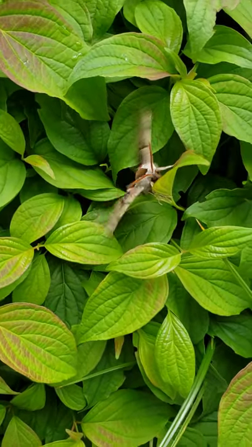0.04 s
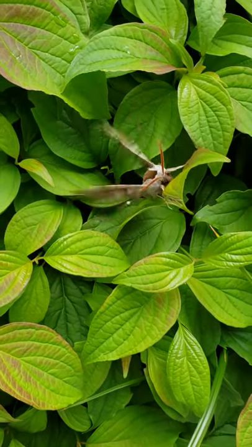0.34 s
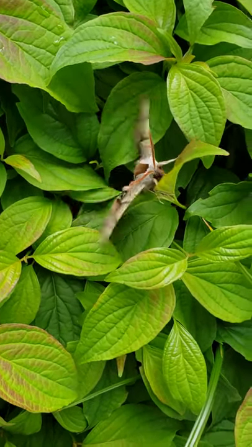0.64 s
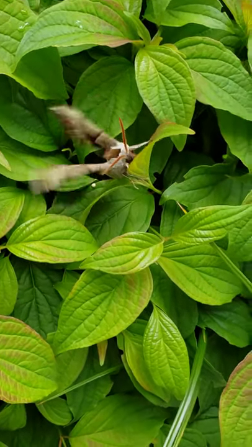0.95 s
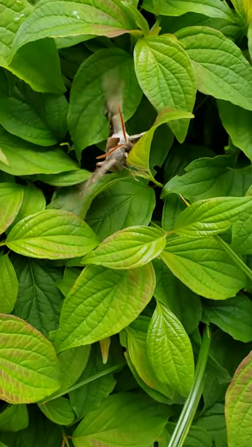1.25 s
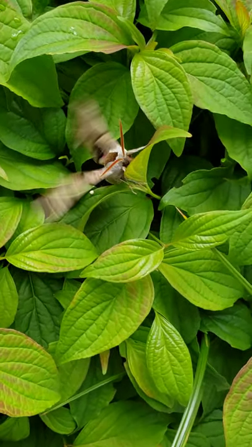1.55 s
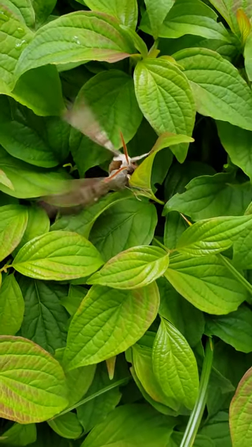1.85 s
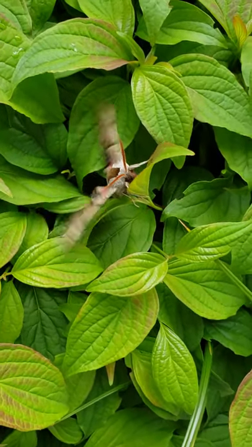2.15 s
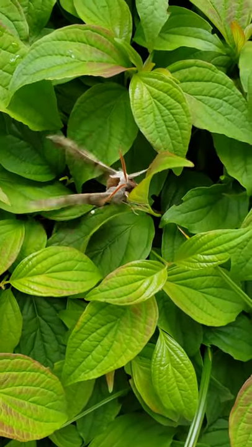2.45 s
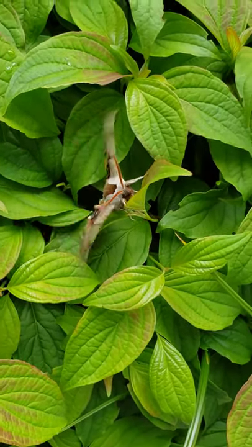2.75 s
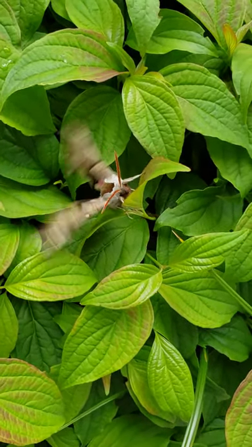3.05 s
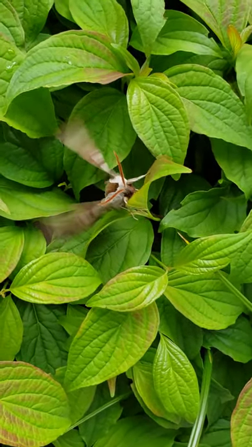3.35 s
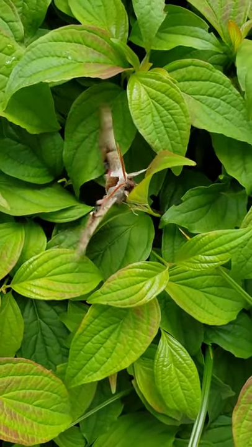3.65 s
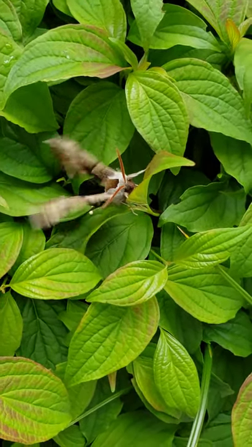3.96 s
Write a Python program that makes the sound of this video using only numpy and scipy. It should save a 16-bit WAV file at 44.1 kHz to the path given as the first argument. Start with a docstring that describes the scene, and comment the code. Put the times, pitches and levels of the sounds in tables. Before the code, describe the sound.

Distant traffic rumbles low throughout a quiet garden, with a wavering engine drone and light microphone hiss. A far bird gives faint, raspy falling chirps about once a second from 0.6 seconds, with thin whistles near 0.9 and 3.7 seconds. Leaves rustle faintly, with a tiny close tick around 0.5 seconds. Two soft, distant hisses echo away at about 1.3 and 2.9 seconds, the second stronger.

```python
"""A low rumble of far traffic fills a quiet garden beside a building, with a wavering engine drone in it.
The rumble and tyre wash are broadband noise; the engine and far machines are modulated tones.
A distant bird repeats a raspy falling chirp that the walls reflect; others whistle thinly.
Two short hisses reverberate from far off, leaves fizz faintly and tick close by,
and the left microphone hisses steadily."""
import sys
import numpy as np
from scipy import signal
from scipy.fft import rfft, irfft
from scipy.io import wavfile

SR = 44100
rng = np.random.default_rng(int(sys.argv[2]) if len(sys.argv) > 2 else 0)


def transcribe(signal):
    """Save signal, clipped to [-1, 1], as a 16-bit WAV file at the path in sys.argv[1]."""
    frames = np.atleast_2d(signal).T
    limited = np.clip(frames, -1, 1)
    pcm = np.round(limited * 32767).astype(np.int16)
    wavfile.write(sys.argv[1], SR, pcm)


N = 176400
TIME, HZ = np.arange(N) / SR, np.fft.rfftfreq(N, 1 / SR)

# traffic rumble and tyre wash (frequency [Hz], density [dB/Hz])
RUMBLE_SPECTRUM = [(15, -91), (25, -81), (33, -69), (45, -71.5), (56, -56.5), (72, -58.5), (90, -58.5),
                   (130, -65), (165, -68), (235, -70.5), (330, -80.5), (500, -94.5), (1000, -115)]
WASH_SPECTRUM = [(100, -91), (200, -78.5), (300, -78.5), (450, -79), (700, -80), (950, -78), (1300, -85.5),
                 (1750, -90), (2300, -96), (2750, -95), (3700, -104), (6000, -115), (9000, -135)]
# contour whose swings the rumble follows at about half depth (time [s], level [dB])
RUMBLE_CONTOUR = [(0.0, -46.5), (0.5, -38.5), (0.68, -44.5), (0.75, -41), (1.76, -41.5), (1.8, -32),
                  (1.83, -46), (1.95, -37.5), (2.15, -45.5), (3.11, -40.5), (3.13, -34.5), (3.27, -51),
                  (3.48, -37), (3.63, -48), (3.68, -35.5), (4.0, -49)]
# engine envelope (time [s], relative level [dB])
DRONE_LEVEL = [(0.0, -37.5), (0.11, -31.5), (0.13, -27.5), (0.29, -40.5), (0.54, -33.5), (0.79, -43.5),
               (0.85, -62), (0.89, -46), (1.05, -49), (1.11, -27), (1.25, -40), (1.28, -34), (1.45, -48),
               (1.48, -41), (1.58, -56), (1.61, -37), (1.79, -41), (1.93, -56), (1.97, -36), (2.14, -61),
               (2.17, -38), (2.28, -53), (2.42, -34), (2.56, -58), (2.61, -39.5), (2.74, -35), (2.75, -40),
               (3.16, -38.5), (3.21, -45), (3.3, -38), (3.54, -30.5), (3.56, -36), (3.89, -34), (4.0, -45)]
# engine pitch (time [s], frequency [Hz])
DRONE_PITCH = [(0, 58.33), (.6, 57.73), (1.05, 62.57), (1.3, 65.6), (1.75, 63), (2, 58), (2.45, 64.9),
               (3, 68), (3.5, 71), (4, 69.2)]
# hums of far machines (frequency [Hz], level [dB])
HUMS = [(120, -51), (135, -56.5), (250, -64.5), (305, -64.5)]
# falling chirps (time [s], end frequency [Hz], level [dB])
CHIRPS = [(.575, 2470, -62), (.612, 1933, -54), (.815, 1960, -57.5), (1.555, 1950, -61), (1.6, 1860, -51),
          (1.925, 2000, -62), (1.98, 2000, -60), (2.475, 2480, -62.5), (2.515, 1932, -59),
          (2.575, 1880, -53.5), (3.053, 1985, -56.5), (3.48, 1977, -60.5), (3.524, 2450, -65),
          (3.557, 1837, -52)]
# whistles (time [s], duration [s], start frequency [Hz], end frequency [Hz], level [dB], roughness [rad])
WHISTLES = [(0.125, 0.45, 3085, 3085, -73, 0.8), (0.745, 0.19, 6000, 5900, -64, 1.6),
            (0.889, 0.071, 6500, 6740, -53, .45), (.985, .075, 6350, 6000, -63, 1.2),
            (3.35, 0.15, 2990, 3010, -68, 0.92), (3.681, .11, 6700, 6644, -66, 1.8),
            (3.725, 0.057, 6150, 5850, -62, 0.71), (3.736, .06, 5450, 5360, -66, 1.1),
            (3.84, 0.18, 3170, 3170, -72, 0.39)]
# wall reflections (delay [s], gain [dB])
WALL_ECHOES = [(.025, -15), (.042, -7), (.068, -16.5)]
# far hisses (time [s], gain [dB])
FAR_HISSES = [(1.25, -8.5), (2.884, -2.5)]
# their spectrum (frequency [Hz], density [dB/Hz])
FAR_HISS_SPECTRUM = [(150, -91), (400, -81), (900, -78), (1700, -84), (2800, -83.5), (3800, -84.5),
                     (4500, -91), (5200, -84.5), (6300, -94), (7500, -103), (9000, -104), (15000, -112)]
# leaf fizz (frequency [Hz], density [dB/Hz])
FIZZ_SPECTRUM = [(1500, -108), (3700, -101), (4800, -99.5), (6400, -99), (7300, -106), (8300, -120),
                 (9300, -106), (10500, -99), (11800, -93.5), (12600, -97), (14000, -96.5), (16000, -100)]
# its swell (time [s], gain [dB])
FIZZ_SWELL = [(0, 1.5), (.3, 1.5), (.52, 7.5), (.65, 4), (1, 6.5), (1.4, 2.5), (1.9, -0.5), (2.8, -3.5),
              (3.2, 0), (3.78, 2.5), (4, -1.5)]
# leaf ticks (time [s], relative level [dB])
TICKS = [(0.0292, -16), (.316, -23), (0.451, -23), (0.553, -5)]
# self-noise of the left microphone (frequency [Hz], density [dB/Hz])
MIC_SPECTRUM = [(300, -81), (2000, -90), (3500, -94), (5500, -94.5), (7600, -89), (8400, -95), (9600, -94),
                (11500, -94), (13500, -93), (16000, -90.5)]
# likeness of left and right (frequency [Hz], coherence [0 to 1])
COHERENCE = [(60, 1), (130, 0.94), (290, .9), (450, 0.53), (640, 0.027), (1400, 0), (15000, 0.0082)]

BASS_PAN_DB = 2.26


def amp(db):
    """Converts decibels to an amplitude ratio."""
    return 10 ** (np.asarray(db) / 20)


def unit(x):
    """Normalises to rms 1."""
    return x / np.sqrt(np.mean(x ** 2) + 1e-20)


def curve(points):
    """Interpolates a table over time."""
    return np.interp(TIME, *np.transpose(points))


def spectrum(points):
    """Interpolates a table over log frequency."""
    hz, value = np.transpose(points)
    return np.interp(np.log(HZ + 1), np.log(hz + 1), value)


def pan(db):
    """Level difference, left minus right, gives direction."""
    return amp([[db / 2], [-db / 2]])


def add(mix, start_s, sound):
    """Superposes a sound on the mix."""
    part = mix[max(round(start_s * SR), 0):][:len(sound)]
    part += sound[:len(part)]


def drift(rate_hz, count=N):
    """Low-passed noise of rms 1 serves as a random modulator."""
    hz = np.fft.rfftfreq(count, 1 / SR)
    white = rfft(rng.standard_normal(count))
    return unit(irfft(white * (hz > 0) * np.exp(-(hz / rate_hz) ** 2), count))


def noise(density):
    """Diffuse-field noise: the channels are coherent only in the bass."""
    left, independent = rfft(rng.standard_normal((2, N)))
    coherence = spectrum(COHERENCE)
    right = coherence * left + np.sqrt(1 - coherence ** 2) * independent
    return irfft(np.array([left, right]) * amp(spectrum(density)), N) * np.sqrt(SR / 2)


def tone(hz):
    """A sine of rms 1 whose phase is the integral of frequency."""
    return np.sqrt(2) * np.sin(2 * np.pi * (np.cumsum(hz) / SR + rng.random()))


def traffic():
    """Amplitude-modulated broadband noise: a low rumble under the wash of tyres."""
    contour_db = curve(RUMBLE_CONTOUR)
    rumble = noise(RUMBLE_SPECTRUM) * amp(0.49 * (contour_db - contour_db.mean()))
    wash = noise(WASH_SPECTRUM) * amp(0.4 * drift(rate_hz=6.3))
    return rumble * pan(BASS_PAN_DB) + wash * pan(db=2.5)


def engine_drone(gain_db=-3, wander_hz=3.19, flutter_db=1.5):
    """Frequency and amplitude modulation make a far engine's low tone waver."""
    drone = tone(curve(DRONE_PITCH) + wander_hz * drift(rate_hz=16.3))
    level_db = curve(DRONE_LEVEL) + gain_db + flutter_db * drift(rate_hz=14)
    return drone * amp(level_db) * pan(BASS_PAN_DB)


def machine_hums(wander_hz=2.19, flutter_db=3):
    """Tones of far machines superpose, each drifting independently in pitch and level."""
    hums = np.zeros(N)
    for hz, db in HUMS:
        hum = tone(hz + wander_hz * drift(rate_hz=5))
        hums += hum * amp(db + flutter_db * drift(rate_hz=4.3))
    return hums * pan(BASS_PAN_DB)


def bird_note(hz, rough_rad, flutter_db=2.5):
    """Random phase and amplitude modulation spread a sine into sidebands, heard as rasp."""
    count = len(hz)
    arch = abs(np.sin(np.linspace(0, np.pi, count))) ** 0.42
    flutter = unit(amp(flutter_db * drift(rate_hz=89, count=count)))
    phase = 2 * np.pi * np.cumsum(hz) / SR + rough_rad * drift(rate_hz=229, count=count)
    return np.sqrt(2) * arch * flutter * np.sin(phase)


def birds(chirp_s=0.0404, voice_ratio=1.33):
    """Frequency sweeps: two-voiced chirps with wall reflections, and thin whistles; both reverberate."""
    calls = np.zeros(N)
    progress = np.linspace(0, 1, round(chirp_s * SR))
    for start_s, end_hz, db in CHIRPS:
        pitch = end_hz * (1 + 0.1897 * (1 - progress) ** 1.754)
        lower_voice = bird_note(pitch, rough_rad=0.62)
        upper_voice = amp(-11) * bird_note(pitch * voice_ratio, rough_rad=1.6)
        chirp = amp(db) * (lower_voice + upper_voice)
        add(calls, start_s, chirp)
        for delay_s, echo_db in WALL_ECHOES:
            add(calls, start_s + delay_s, chirp * amp(echo_db))
    for start_s, length_s, start_hz, end_hz, db, rough_rad in WHISTLES:
        glide = np.linspace(start_hz, end_hz, round(length_s * SR))
        add(calls, start_s, amp(db) * bird_note(glide, rough_rad))
    return (calls + reverberation(calls)) * pan(db=8)


def reverberation(sound, t60_s=0.64, build_s=0.017, gain_db=-2.5):
    """Diffuse reflections decay exponentially, differing in each channel and shifting as the air moves."""
    t, wet = np.arange(SR) / SR, np.zeros((2, N))
    envelope = amp(-60 * t / t60_s) * (1 - np.exp(-t / build_s))
    for crossfade in (np.cos(2 * TIME), np.sin(2 * TIME)):
        tail = rng.standard_normal((2, SR)) * envelope
        tail /= np.linalg.norm(tail[0])
        wet += signal.fftconvolve((sound * crossfade)[None], tail, axes=1)[:, :N]
    return amp(gain_db) * wet


def far_hisses(rise_s=0.03, t60_s=1.65):
    """Reverberant decay: far noise bursts swell quickly and die away between the walls."""
    envelope = np.zeros(N)
    for start_s, db in FAR_HISSES:
        age = np.maximum(TIME - start_s, 0)
        attack = np.minimum(age / rise_s, 1) ** 0.5
        envelope += attack * amp(db - 60 * np.maximum(age - rise_s, 0) / t60_s)
    return noise(FAR_HISS_SPECTRUM) * envelope * pan(db=6)


def leaf_fizz(flicker_db=1.23):
    """Amplitude-modulated treble noise: the fizz of leaves swells, ebbs and flickers."""
    return noise(FIZZ_SPECTRUM) * amp(curve(FIZZ_SWELL) + flicker_db * drift(rate_hz=21)) * pan(db=3.5)


def leaf_ticks(band_hz=(8400, 16800), snap_s=0.00017, ring_t60_s=0.035, left_lag_s=0.00026):
    """Damped transients: a snap and a papery ring, placed on the right by arrival-time difference."""
    ticks, t = np.zeros((2, N)), np.arange(2048) / SR
    snap = np.exp(-t / snap_s) * np.cos(2 * np.pi * np.mean(band_hz) * t)
    for start_s, db in TICKS:
        for channel, lag_s in zip(ticks, (left_lag_s, 0)):
            ring = rng.standard_normal(len(t)) * amp(-13.5 - 60 * t / ring_t60_s)
            add(channel, start_s + lag_s, amp(db - 15.5) * (2 * snap + ring))
    bandpass = signal.butter(2, band_hz, "bandpass", fs=SR, output="sos")
    return signal.sosfilt(bandpass, ticks)


def scene():
    """Linear superposition of the sources heard in the garden."""
    return traffic() + engine_drone() + machine_hums() + birds() + far_hisses() + leaf_fizz() + leaf_ticks()


def record(dry, cutoff_hz=15850):
    """The left microphone adds self-noise; a low-pass filter limits the bandwidth."""
    left_hiss = noise(MIC_SPECTRUM) * np.array([[1], [0]])
    lowpass = signal.firwin(511, cutoff_hz, window=("kaiser", 9), fs=SR)
    return signal.oaconvolve(dry + left_hiss, lowpass[None], "same")


dry = scene()
out = record(dry)
transcribe(out)
```